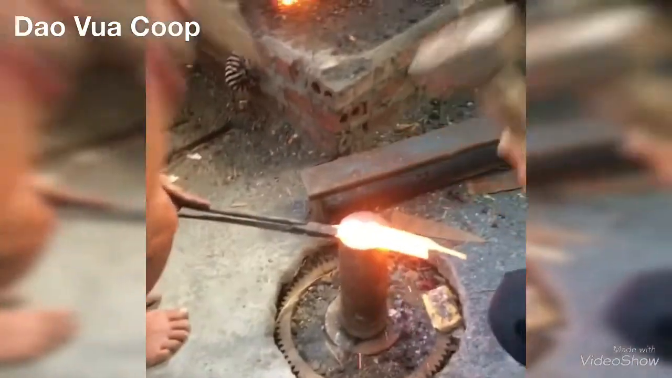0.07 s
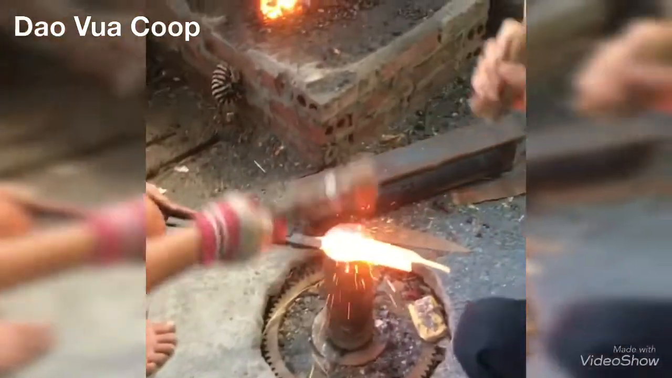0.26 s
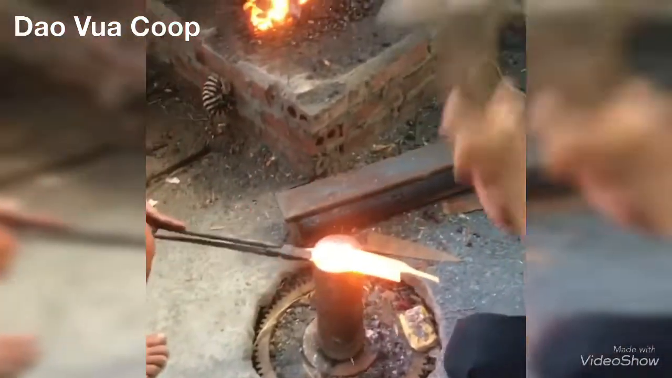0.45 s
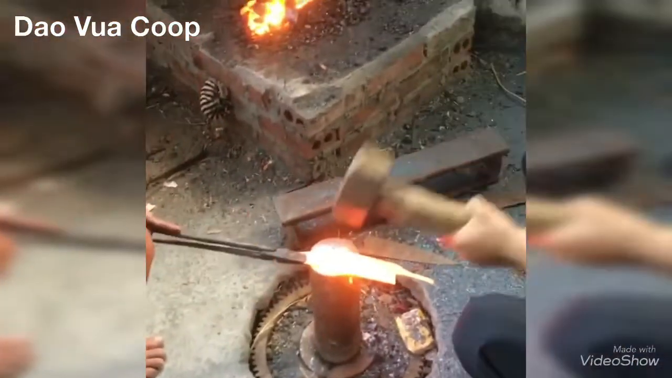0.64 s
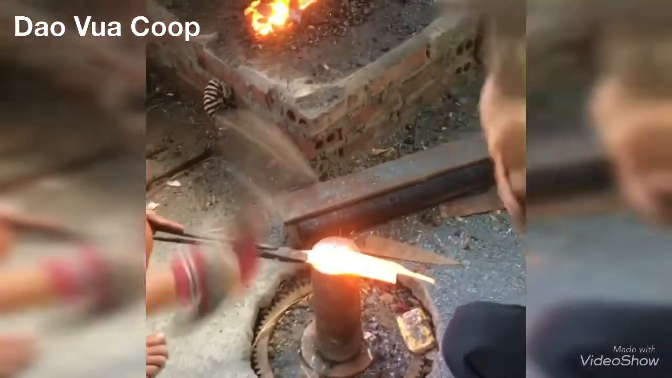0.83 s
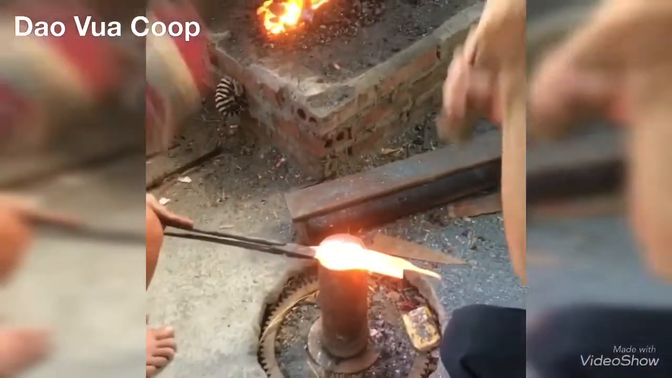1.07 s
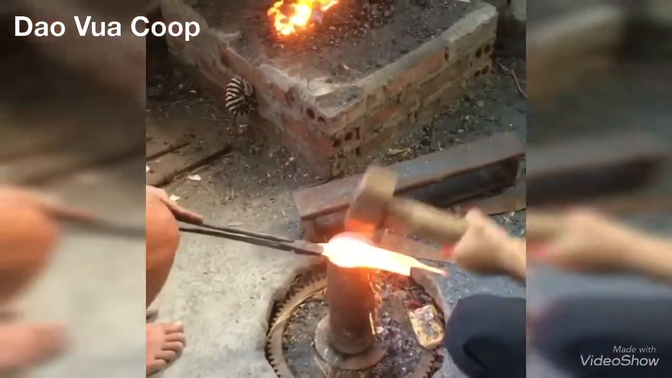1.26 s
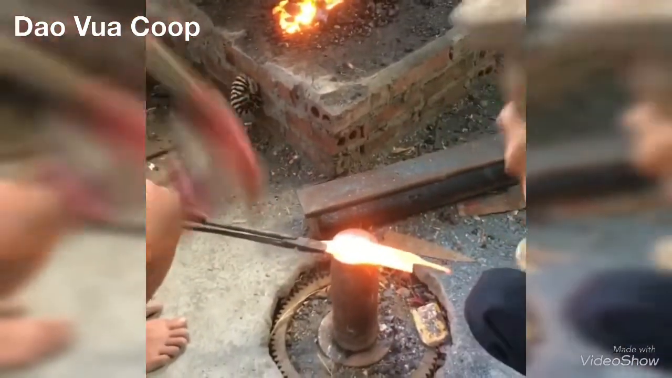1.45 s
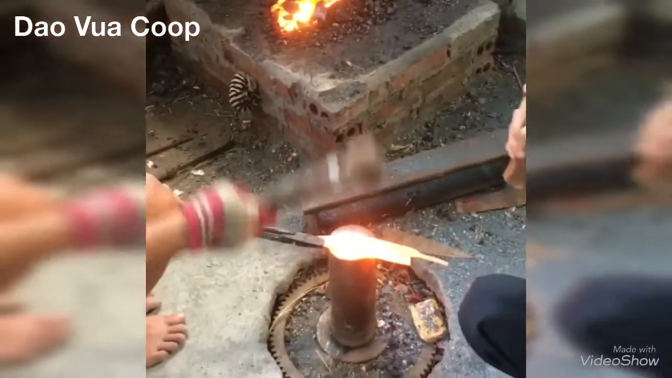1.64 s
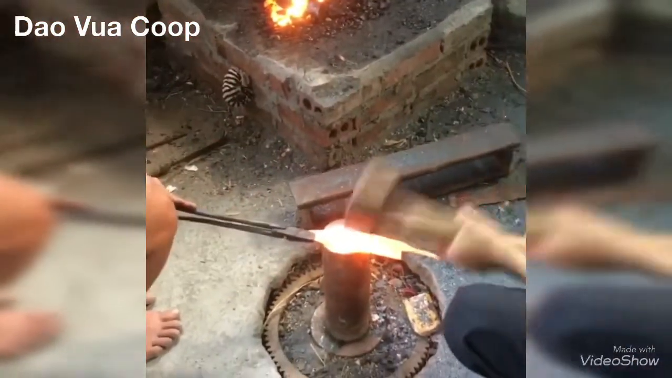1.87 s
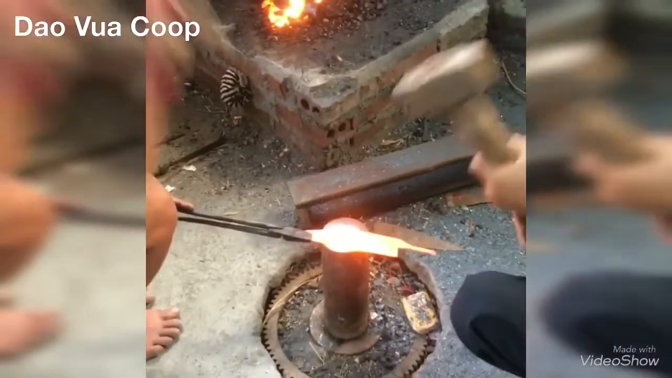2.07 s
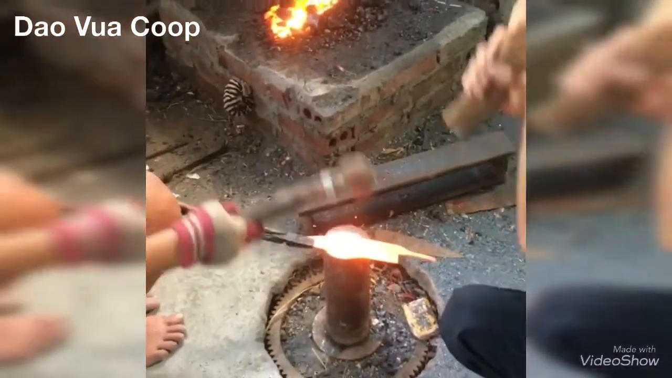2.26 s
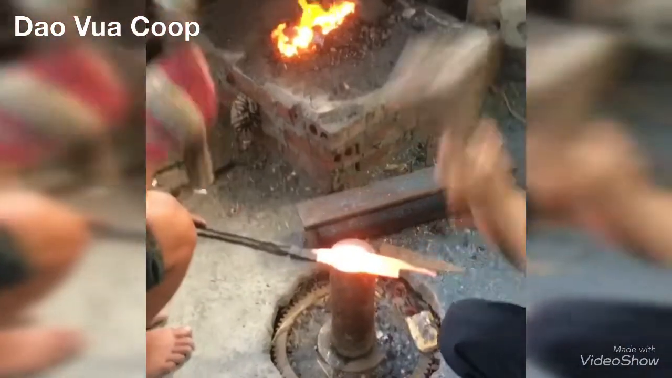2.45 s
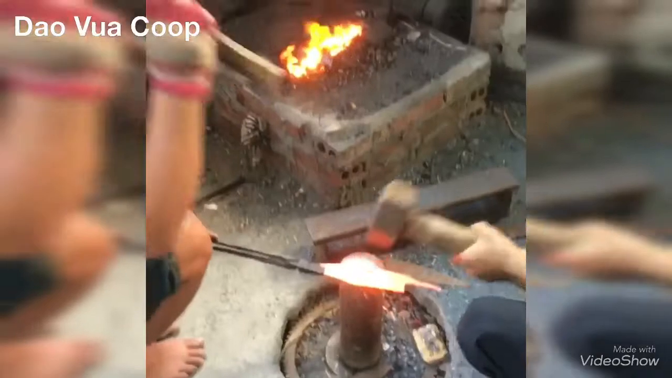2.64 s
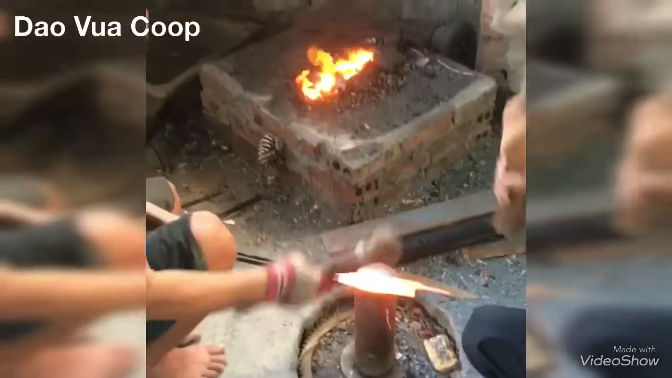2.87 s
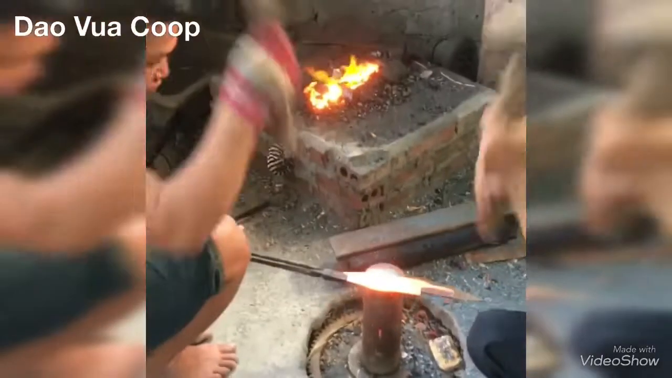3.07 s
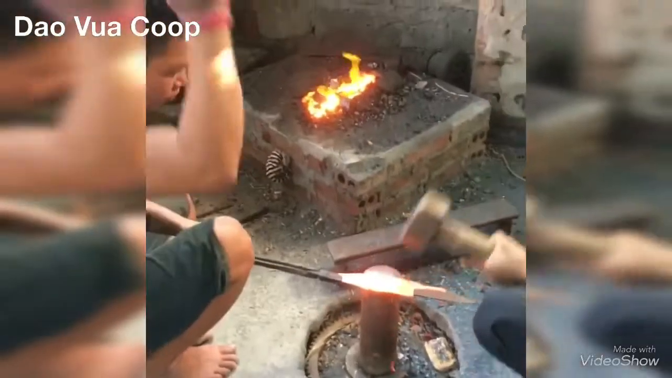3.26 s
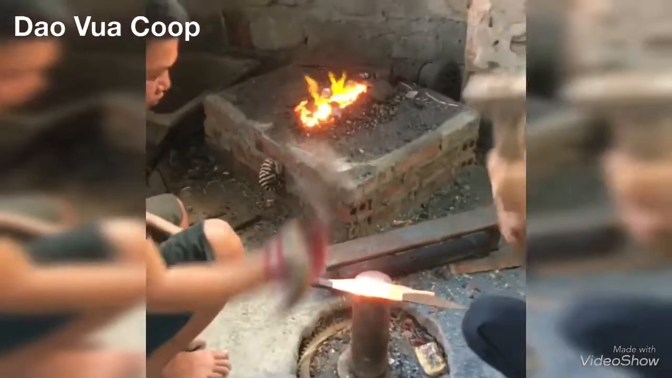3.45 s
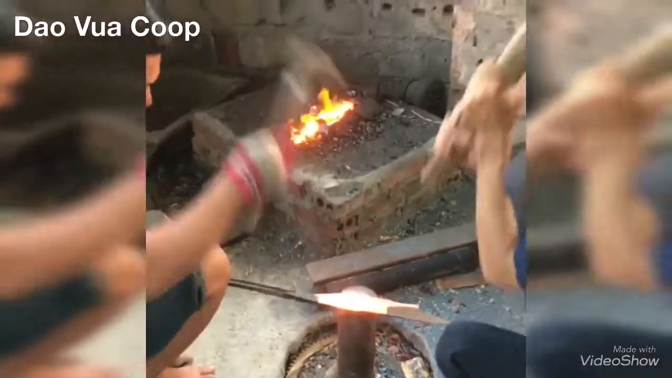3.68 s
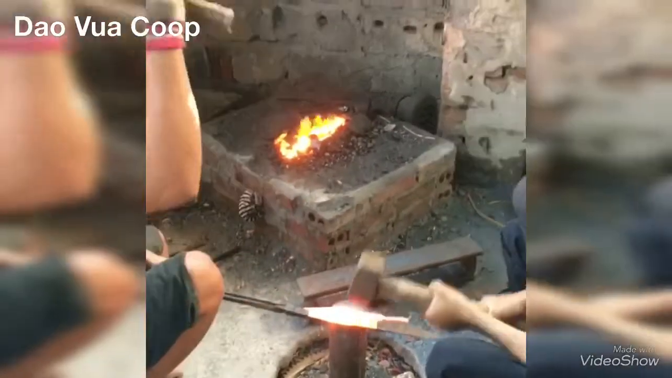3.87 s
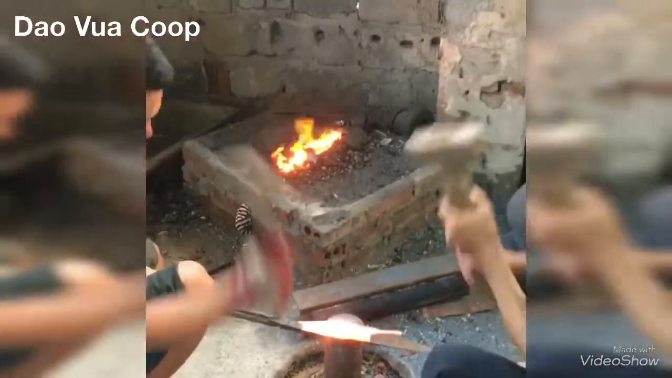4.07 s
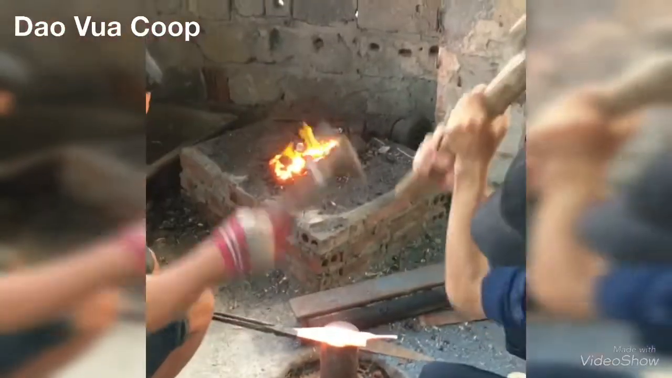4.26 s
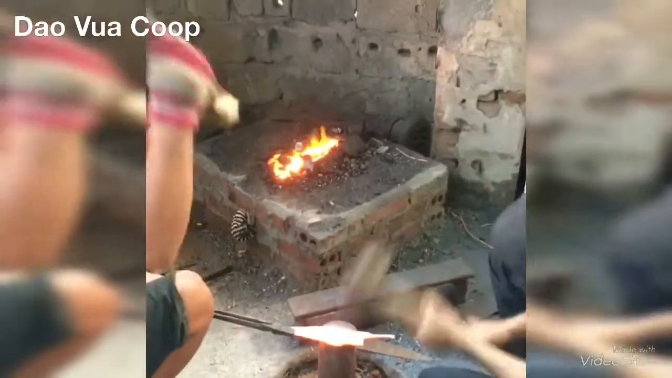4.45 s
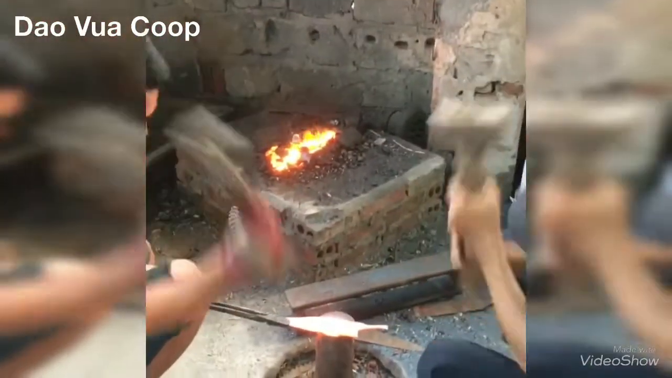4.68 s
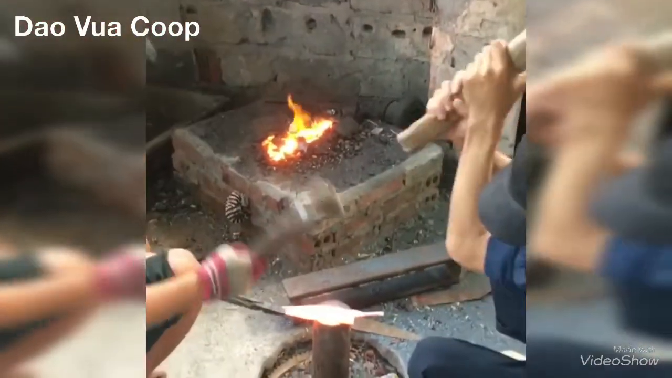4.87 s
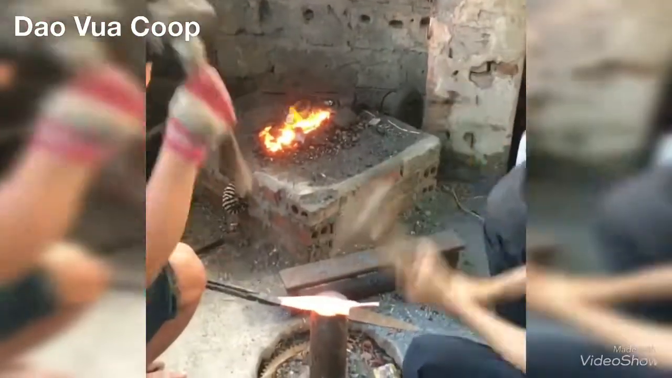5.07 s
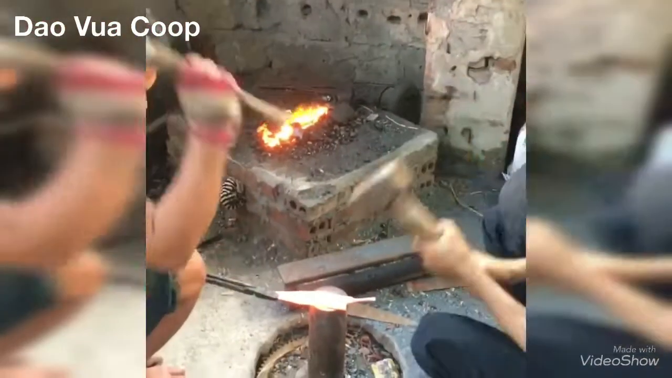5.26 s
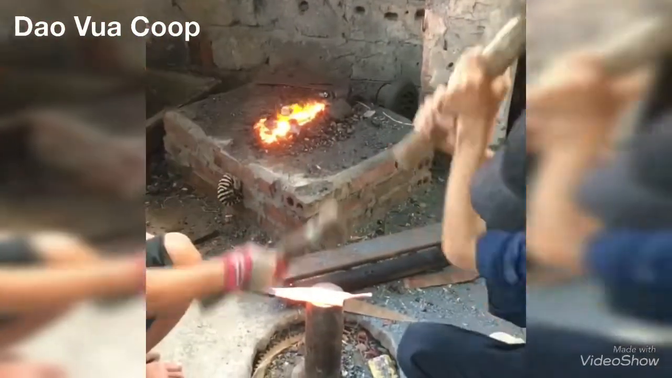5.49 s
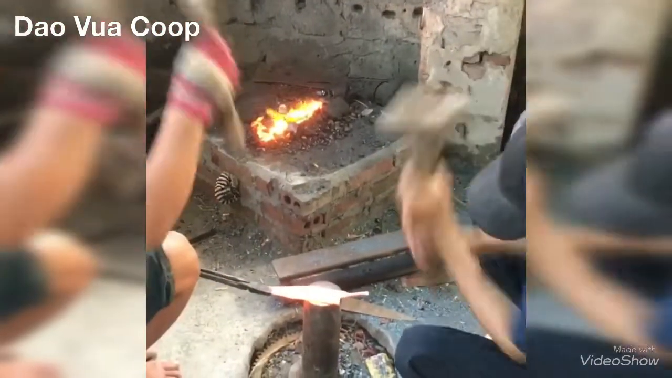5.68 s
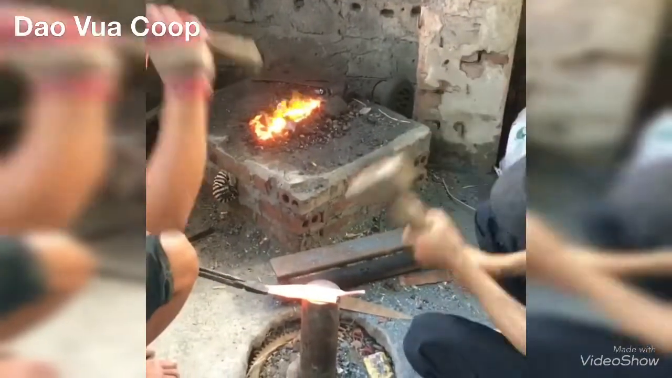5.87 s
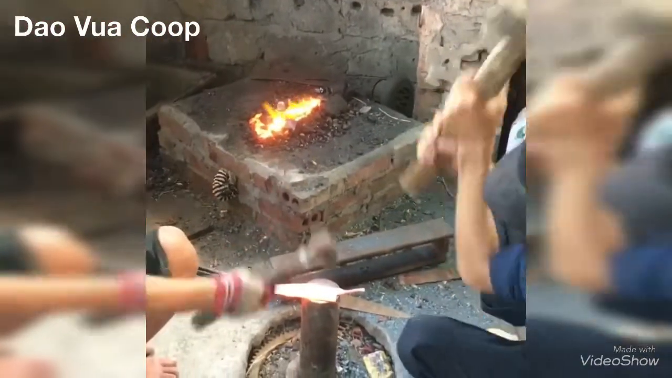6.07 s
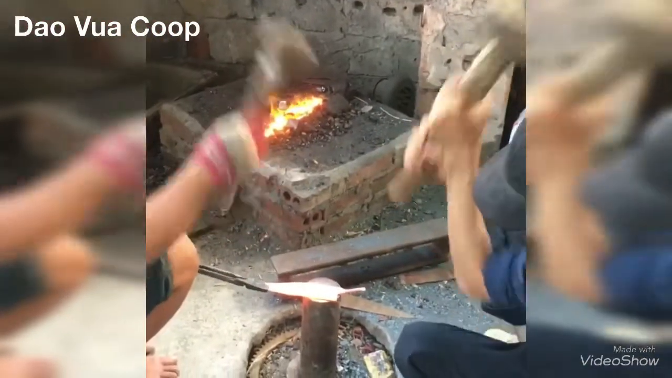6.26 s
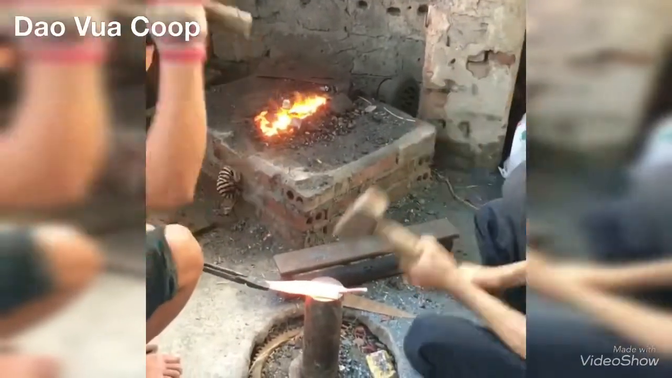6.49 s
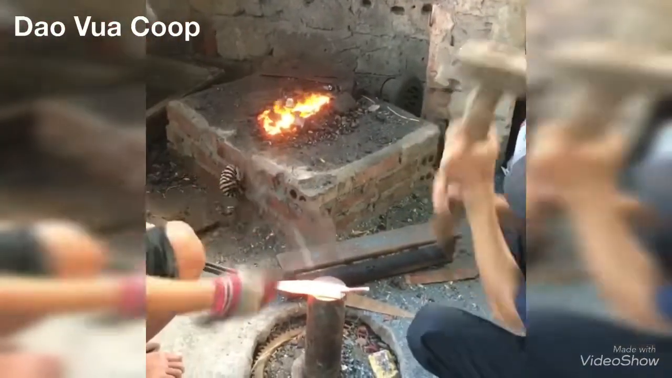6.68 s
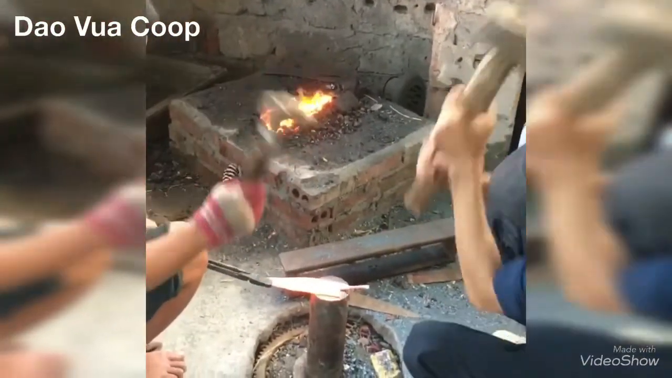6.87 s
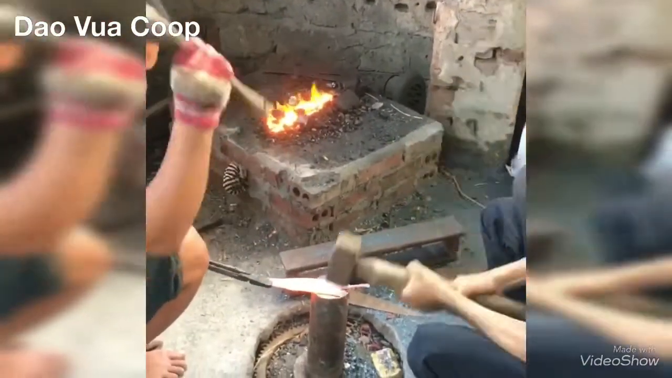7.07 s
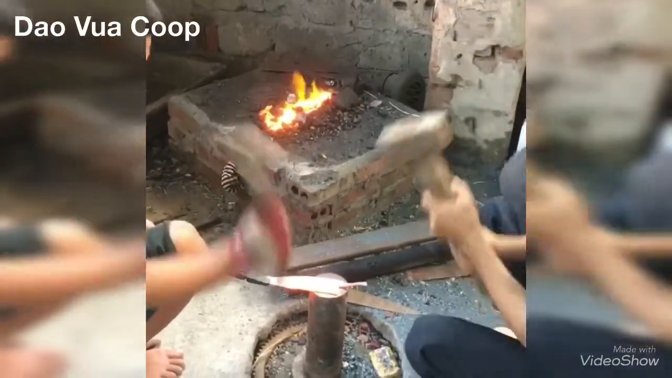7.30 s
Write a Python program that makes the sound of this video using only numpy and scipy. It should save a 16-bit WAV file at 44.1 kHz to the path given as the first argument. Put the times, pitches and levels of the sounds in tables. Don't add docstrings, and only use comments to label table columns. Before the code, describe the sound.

Two people forge a glowing bar on a steel post anvil in a brick-walled shed open to a yard. At 0 s the tail of a previous sledge blow is dying. A light hammer strikes at 0.24 s, bright and clipped, then a heavy sledge at 0.61 s, louder and deeper. They keep alternating, light at about 0.9, 1.6, 2.2 and 2.9 s, sledge at 1.3, 1.9, 2.6 and 3.2 s, each repeating every 0.65 s until the last light blow at 6.8 s and sledge at 7.1 s. Strength and ring vary slightly; sledge blows around 4 to 6.5 s are a little stronger. Each crack has rings lasting hundredths of a second, a short post hum, dense wall echoes and a weaker yard tail. The stump thumps faintly, a blower rushes quietly throughout. Close mono pickup, limited peaks, dulled top and slightly smeared, patchy treble.

```python
import sys
import numpy as np
from scipy import signal
from scipy.fft import rfft, irfft
from scipy.io import wavfile
from scipy.ndimage import uniform_filter1d, minimum_filter1d, map_coordinates

SR = 44100
rng = np.random.default_rng(int(sys.argv[2]) if len(sys.argv) > 2 else 0)


def inscribe(sig):
    pcm = np.round(np.clip(np.atleast_2d(sig).T, -1, 1) * 32767)
    wavfile.write(sys.argv[1], SR, pcm.astype(np.int16))


def ratio(d):
    e = np.asarray(d, float) / 20
    return 10 ** e


N = 323253
SPAN = int(0.7 * SR)
AHEAD = int(0.1 * SR)


def unit(x):
    return x / np.sqrt(np.mean(x ** 2) + 1e-20)


def along(points, hz):
    f, value = np.transpose(points)
    return np.interp(np.log(hz + 1), np.log(f + 1), value)


def colour(x, db):
    return irfft(rfft(x) * ratio(db), x.shape[-1])


# f/Hz, level/dB per Hz
BLOWER = [(15, -30), (25, 1), (104, 4.5), (227, -4), (379, -5.5), (524, -14), (923, -10), (1180, -8.5),
          (2370, -13), (3850, -29), (7140, -41.5), (9610, -28.5), (15600, -41)]


def blower():
    air = colour(rng.standard_normal(N), along(BLOWER, np.fft.rfftfreq(N, 1 / SR)))
    swell = map_coordinates(rng.standard_normal(40), [np.arange(N) * 4 / SR])
    return ratio(-52 + 0.46 * swell) * unit(air)


def causal(db):
    cepstrum = irfft(np.maximum(db, -90) * np.log(10) / 20)
    half = len(cepstrum) // 2
    cepstrum[1:half] *= 2
    cepstrum[half + 1:] = 0
    return irfft(np.exp(rfft(cepstrum)))[:half]


def ringing(modes, t, spread_db, attack, longest):
    total = np.zeros(len(t))
    detune = 1 + 0.0072 * rng.standard_normal(len(modes))
    for (hz, db, t60), d in zip(modes, detune):
        fading_db = db + rng.normal(0, spread_db) - 60 * t / min(t60, longest)
        total += ratio(fading_db) * np.sin(2 * np.pi * hz * d * t)
    return (1 - np.exp(-t / attack)) * total


def tail(decays):
    hz, t, z = signal.stft(rng.standard_normal(SPAN), SR, nperseg=256)
    fade = ratio(-60 * t / along(decays, hz)[:, None])
    x = signal.istft(z * fade, SR, nperseg=256)[1][:SPAN]
    return x / np.linalg.norm(x)


def near_walls(count, within):
    when, size = rng.random((2, count))
    echoes = np.zeros(SPAN)
    places = (SR * (0.003 + within * when)).astype(int)
    echoes[places] = np.sign(size - 0.5) * ratio(-8 * size)
    return echoes


# f/Hz, t60/s
SHED = [(60, 0.3), (250, 0.29), (800, 0.36), (1800, 0.36), (4000, 0.31), (7000, 0.28), (12000, 0.27)]
# f/Hz, t60/s
YARD = [(100, 1.2), (1500, 1.12), (7000, 0.83), (14000, 0.41)]
# f/Hz, t60/s
HEARTH = [(3000, 0.045), (14000, 0.1)]
# f/Hz, level/dB, t60/s
SHED_MODES = [(130.4, -54, 0.63), (150.7, -52.5, 0.593), (180.4, -55.5, 0.51), (212, -67.5, 0.047),
              (275.8, -52.5, 0.44), (351, -59, 0.93), (413, -59.5, 0.54)]


def shed(walls, t, direct_db, early_db):
    room = 0.9 * walls + 0.8 * tail(SHED)
    room *= 1 - 0.29 * np.exp(-t / 0.0072)
    room += ratio(early_db) * near_walls(count=24, within=0.026)
    room += ratio(-17.5) * tail(YARD) * (1 - np.exp(-t / 0.021))
    room += ringing(SHED_MODES, t, spread_db=1.5, attack=0.002, longest=0.5)
    room += ratio(-8) * np.diff(tail(HEARTH), prepend=0)
    room[0] += ratio(direct_db)
    return room


RING_PIVOT_HZ = 1660
# f/Hz, level/dB, t60/s
POST = [(756, -54.5, 0.33), (1688, -55.5, 0.28), (1794, -57, 0.44), (2270, -67, 0.27), (2980, -68, 0.25)]


def hammer(blows, zones, crack, ring, tilt, post_db, direct_db, early_db, gain_db):
    out, t = np.zeros(N + AHEAD + 2 * SPAN), np.arange(SPAN) / SR
    hz = np.fft.rfftfreq(8192, 1 / SR)
    walls = tail(SHED)
    follows = np.zeros(len(hz))
    for centre, octaves, share in zones:
        follows += share * np.exp(-0.5 * (np.log2((hz + 1) / centre) / octaves) ** 2)
    for start_s, db, square_db, ring_db, _ in blows:
        pulse = causal(along(crack, hz) + square_db * follows)
        pulse /= np.linalg.norm(pulse)
        struck = [(f, level + tilt * square_db * np.log2(f / RING_PIVOT_HZ), t60)
                  for f, level, t60 in ring]
        steel = ringing(struck, t[:len(pulse)], spread_db=2, attack=0.0004, longest=0.04)
        pulse += ratio(ring_db) * steel
        hum = ringing(POST, t, spread_db=2, attack=0.003, longest=0.55)
        answer = shed(walls, t, direct_db, early_db) + ratio(post_db + ring_db) * hum
        start = round(start_s * SR) + AHEAD
        out[start:start + SPAN] += ratio(db + gain_db) * signal.fftconvolve(pulse, answer)[:SPAN]
    return out[AHEAD:AHEAD + N]


# t/s, level/dB, squareness of contact/dB, ring of the steel/dB, push into the ground/dB
SLEDGE = [(0.609, -9, 8, 1.6, -24), (1.278, -9, -4, 5.5, -25), (1.9302, -10.5, -1, 4.3, -38),
          (2.5856, -9.5, 0, 2.1, -39), (3.2408, -8.5, -3, 2.2, -38), (3.8939, -7, -4, 1.6, -36),
          (4.5436, -7.5, -5, 1.8, -25), (5.1898, -8, -5.5, 1.9, -31), (5.838, -7.5, -8, 4.5, -40),
          (6.4907, -8, -8, 0.33, -41), (7.1371, -9.5, -1, 1.7, -31)]
# t before the start/s, level against a usual blow/dB
EARLIER = (0.095, -2.4)
# f/Hz, level/dB per Hz
SLEDGE_CRACK = [(35, -30), (60, 1.5), (285, 7.5), (510, -3), (794, 4.5), (1030, -1), (1710, 7.5), (2110, 1),
                (3950, -0.5), (4760, -7.5), (6910, -8), (10500, -16.5), (15600, -18.5)]
# f/Hz, level/dB, t60/s
SLEDGE_RING = [(1731, -30.5, 0.025), (1590, -43, 0.03), (806, -44, 0.044), (2398, -38.5, 0.044),
               (3020, -35, 0.01), (3310, -47, 0.012), (4100, -40, 0.013), (7040, -37, 0.0082)]
# f/Hz, width/octaves, change/dB per dB
SLEDGE_ZONES = [(236, 1.65, 1), (830, 0.45, 0.29), (1574, 0.25, 0.66), (5750, 0.23, -0.65),
                (10800, 1.6, 0.72)]


def sledge():
    before_s, softer_db = EARLIER
    first = np.array(SLEDGE[1]) + [-SLEDGE[1][0] - before_s, softer_db, 0, 0, 0]
    return hammer(np.vstack([SLEDGE, first]), SLEDGE_ZONES, SLEDGE_CRACK, SLEDGE_RING,
                  tilt=-0.31, post_db=0, direct_db=-11, early_db=-17, gain_db=24)


# t/s, level/dB, squareness of contact/dB, ring of the steel/dB, push into the ground/dB
LIGHT = [(0.2382, -11.5, -1, -5, -15), (0.9155, -12, 1.5, -3, -22), (1.5887, -13, 2, -3, -24),
         (2.2335, -12.5, -1, 0, -35), (2.889, -12, 1.5, -5, -30), (3.5316, -11.5, 0.5, -4, -27),
         (4.1815, -12, 2, -6, -29), (4.8325, -12.5, 4, -2.5, -11.5), (5.4878, -12.5, 1.5, -4, -26),
         (6.1308, -12.5, 4, -1.5, -27), (6.779, -12.5, 2.5, 1, -22)]
# f/Hz, level/dB per Hz
LIGHT_CRACK = [(35, -49), (60, -11.5), (139, -8.5), (216, -8), (285, -4.5), (498, -14.5), (644, -12.5),
               (1880, -1), (2110, -3), (4870, -9), (7070, -7.5), (7950, -12), (15600, -25)]
# f/Hz, level/dB, t60/s
LIGHT_RING = [(7130, -22, 0.011), (7430, -34, 0.0049)]
# f/Hz, width/octaves, change/dB per dB
LIGHT_ZONES = [(220, 0.64, -0.43), (1700, 0.52, -0.16), (6500, 0.094, 0.9), (12000, 0.7, -0.34)]


def light_hammer():
    return hammer(np.array(LIGHT), LIGHT_ZONES, LIGHT_CRACK, LIGHT_RING,
                  tilt=0.4, post_db=-16, direct_db=-18.5, early_db=-15.5, gain_db=27)


def stump(blows, rock_db):
    out, t = np.zeros(N + SPAN), np.arange(SPAN) / SR
    late = np.maximum(t - 0.035, 0)
    push = np.sin(2 * np.pi * 68 * t) * ratio(2.5 - 60 * t / 0.021)
    rebound = np.sin(2 * np.pi * 46 * late) * (late / 0.022) * np.exp(1 - late / 0.026)
    for start_s, *_, push_db in blows:
        rebound_db = rock_db - 0.11 * (push_db + 29)
        out[round(start_s * SR):][:SPAN] += ratio(push_db) * push + ratio(rebound_db) * rebound
    return out[:N]


# f/Hz, width/Hz, level/dB
NOTCHES = [(99, 7.9, -10.5), (4910, 136, -3.5), (10580, 160, -5)]


def microphone(x):
    hz = np.fft.rfftfreq(N, 1 / SR)
    db = -3 / (1 + (hz / 110) ** 4)
    for centre, width, depth_db in NOTCHES:
        db = db + depth_db / (1 + ((hz - centre) / width) ** 2)
    return colour(x, db)


def limiter(x):
    level = np.sqrt(np.abs(uniform_filter1d(x ** 2, 160, axis=1)))
    need = np.minimum(1, (ratio(-5.5) / (level + 1e-9)) ** 0.42)
    x = x * uniform_filter1d(minimum_filter1d(need, 300, axis=1), 200, axis=1)
    return x / (1 + np.abs(x / 0.65) ** 4) ** (1 / 4)


# f/Hz, level/dB
SWELL_COLOUR = [(40, -34), (200, -19), (1200, -28), (2700, -24), (3150, -12), (3600, -20), (4000, -24),
                (4300, -60), (16000, -60)]


def swell_ahead(x):
    t = np.arange(1024) / SR
    grain = colour(rng.standard_normal(len(t)), along(SWELL_COLOUR, np.fft.rfftfreq(len(t), 1 / SR)))
    swell = grain * np.exp(-t / 0.008) / np.sqrt(0.004 * SR)
    swell[-1] += ratio(-39.5)
    early = signal.fftconvolve(x, swell[None, ::-1], axes=1)[:, len(t):]
    return np.pad(early, ((0, 0), (0, 1)))[:, :N]


# f/Hz, level/dB
COARSE = [(2500, -7.5), (4600, -7), (7800, -8.5), (10500, -17), (14000, -3), (15500, 2)]
# f/Hz, level/dB
HUSH = [(3000, -120), (10000, -104), (14000, -103), (15500, -88), (15800, -50)]


def starved(x):
    hz, _, z = signal.stft(x[0], SR, nperseg=2048)
    size_db = 20 * np.log10(np.abs(z) + 1e-9)
    around = uniform_filter1d(np.abs(z) ** 2, size=90, axis=0)
    around_db = 10 * np.log10(np.abs(around) + 1e-18)
    luck = rng.standard_normal((len(hz) // 20 + 1, z.shape[1]))
    luck = unit(uniform_filter1d(luck, size=4, axis=1))
    luck_db = 5 * np.repeat(luck, 20, axis=0)[:len(hz)]
    relative_db = around_db + along(COARSE, hz)[:, None]
    least_db = np.maximum(relative_db, along(HUSH, hz)[:, None]) + luck_db
    least_db[hz < 2900] = -200
    loud_db = around_db[200:600].mean(axis=0)
    attack = np.diff(loud_db, prepend=0) > 5
    kept = z * ((size_db > least_db) | attack)
    return signal.istft(kept, SR, nperseg=2048)[1][None, :N]


# f/Hz, level/dB
BAND_EDGE = [(15550, 0), (15850, -12), (16500, -20), (16800, -45), (17200, -90)]


def treble_edge(x):
    return colour(x, along(BAND_EDGE, np.fft.rfftfreq(N, 1 / SR)))


def scene():
    air = blower()
    blows = sledge() + light_hammer()
    ground = stump(SLEDGE, rock_db=-39) + stump(LIGHT, rock_db=-49.5)
    return (air + blows + ground)[None]


def low_pass(x):
    return signal.sosfilt(signal.butter(12, 16810, fs=SR, output="sos"), x)


def record(dry):
    x = limiter(microphone(dry))
    x = starved(x + swell_ahead(x))
    x = treble_edge(x)
    return low_pass(x)


dry = scene()
out = record(dry)
inscribe(out)
```